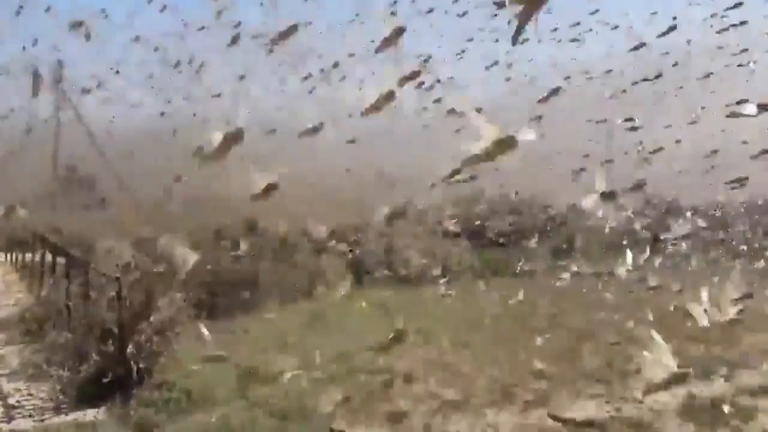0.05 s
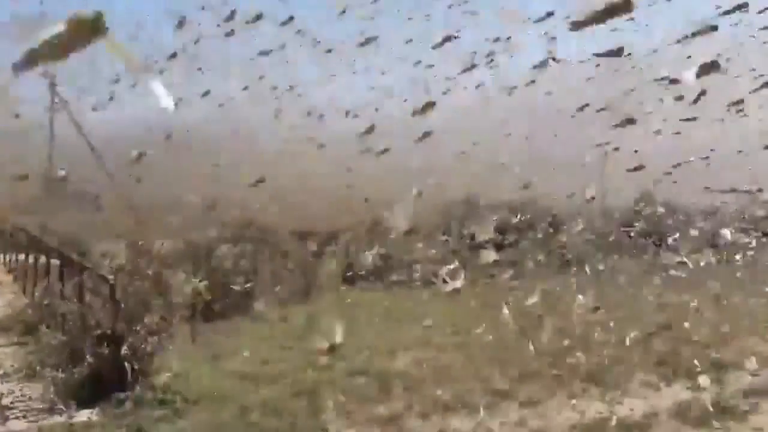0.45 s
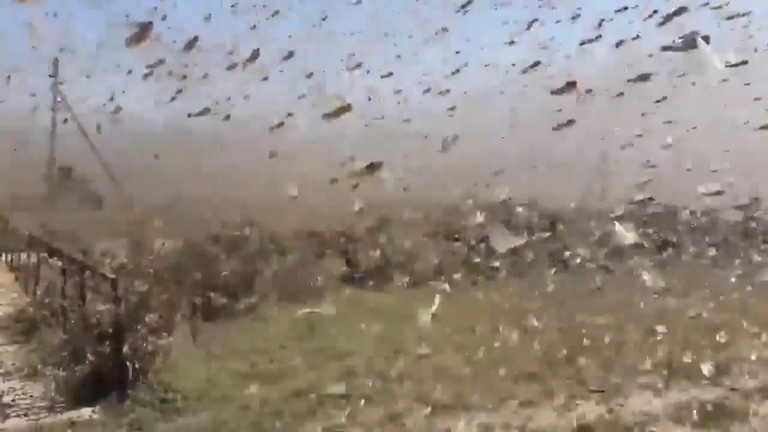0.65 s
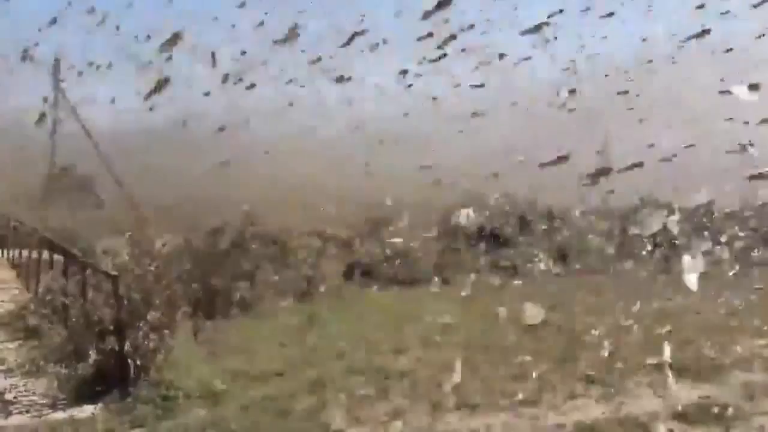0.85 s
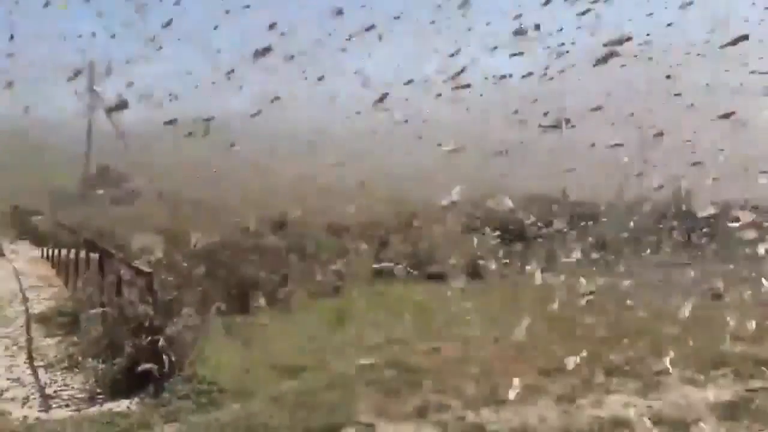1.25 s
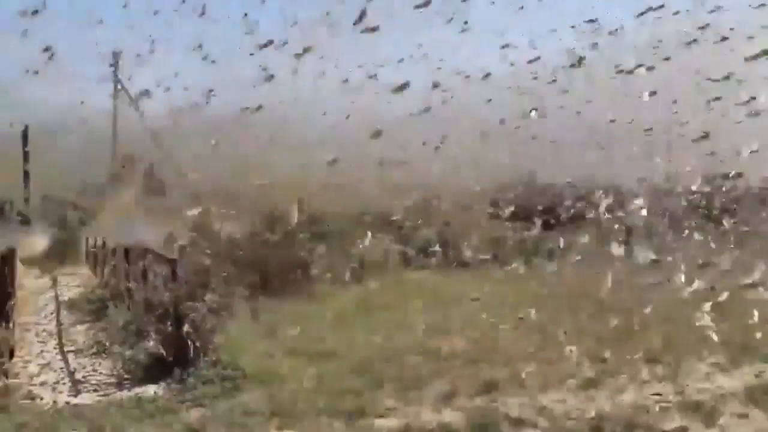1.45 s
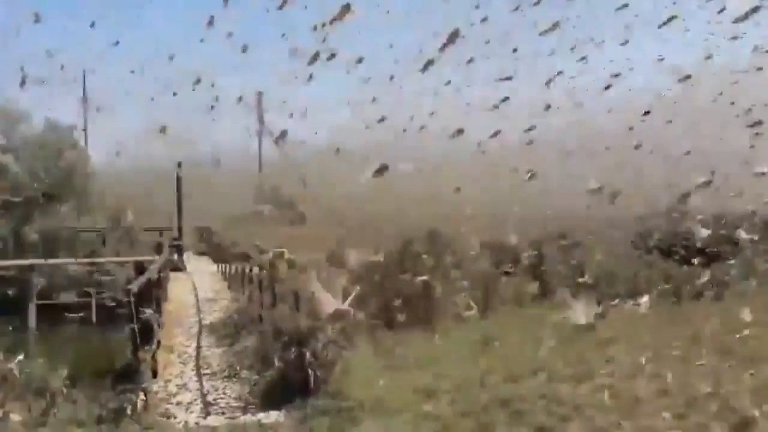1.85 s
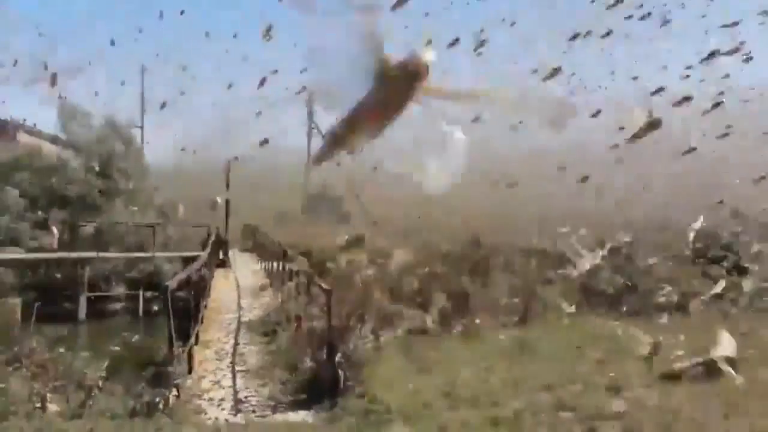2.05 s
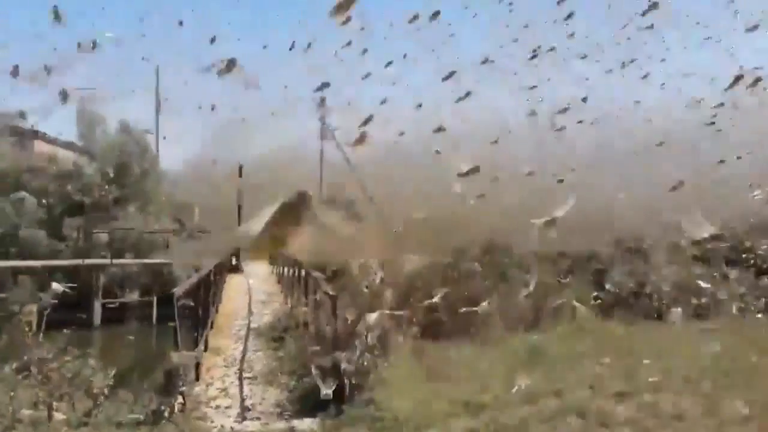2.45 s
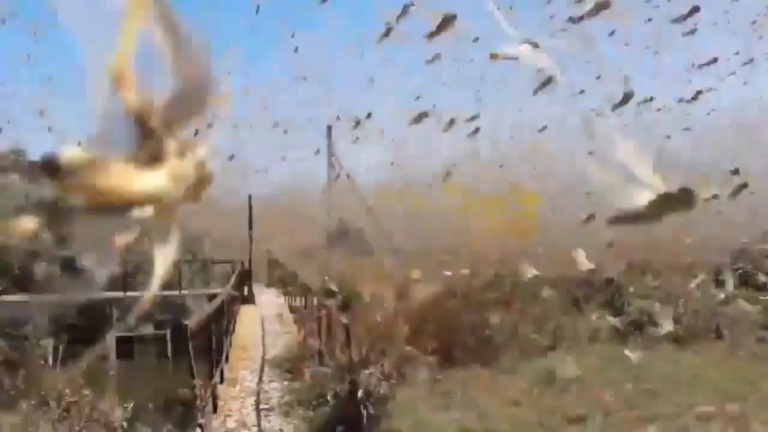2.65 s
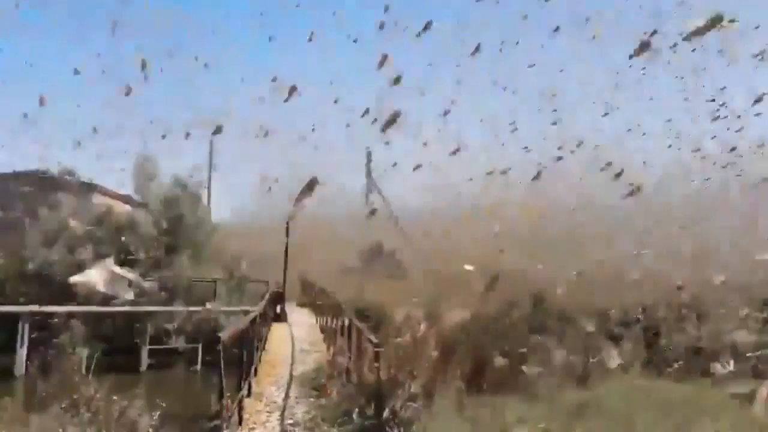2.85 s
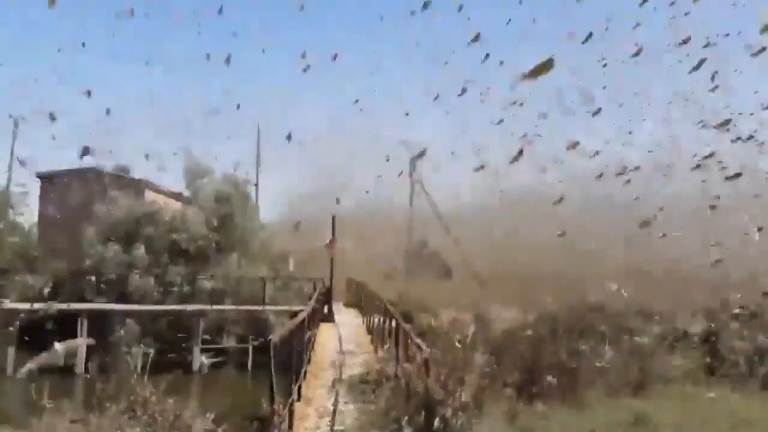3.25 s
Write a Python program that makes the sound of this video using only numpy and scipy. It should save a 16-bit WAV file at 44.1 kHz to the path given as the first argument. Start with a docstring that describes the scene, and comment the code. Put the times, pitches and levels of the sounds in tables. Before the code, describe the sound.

A locust swarm hisses and flutters while gusts of wind buffet the microphone.

```python
"""A grassy field under a locust swarm. Countless far wings add incoherently into a hiss, while nearer
insects tick once a wingbeat. Turbulent wind buffets the microphone port, louder and brighter as each
gust grows. One locust flutters right up to the microphone, brushes it with papery wings, knocks the
modes of its casing into ringing a few times and leaves."""
import sys
import numpy as np
from scipy import signal
from scipy.fft import rfft, irfft
from scipy.io import wavfile
from scipy.ndimage import uniform_filter1d

SR = 44100
rng = np.random.default_rng(int(sys.argv[2]) if len(sys.argv) > 2 else 0)


def transcribe(u):
    """Save the signal u as a 16-bit wav file named by the first command-line argument.

    u: samples, shape (n,) or (channels, n), limited to [-1, 1]; the rate is SR.
    q: integer samples, one column per channel.
    """
    v = np.clip(np.atleast_2d(u).T, -1, 1)
    q = np.round(v * 32767).astype(np.int16)
    wavfile.write(sys.argv[1], SR, q)


N = 145530
TIME = np.arange(N) / SR
CUTOFF_HZ = 15950

# Loudness of the distant swarm. Each row: time in seconds, level in dB.
SWARM_LEVEL_CURVE = [(0, -44), (.3, -44), (.9, -45), (1.2, -45), (1.65, -44.5), (2.1, -44), (2.45, -42),
                     (2.8, -45), (3.3, -45.5)]
# Spectrum of the distant swarm. Each row: frequency in Hz, relative spectral density in dB.
SWARM_SPECTRUM = [(150, -14), (550, 3), (850, -1), (1250, 0), (2000, -3), (2600, -6), (3900, -5),
                  (6200, -9.5), (8200, -7.5), (9700, -10), (11200, -8.5), (13500, -12.5), (15700, -12)]
# Breeze between the buffets. Each row: time in seconds, strength in dB.
BREEZE_CURVE = [(0, -37), (.18, -42.5), (.45, -36.5), (.68, -40), (.9, -33.5), (1.35, -30.5), (1.6, -30.5),
                (1.73, -37), (2.25, -42), (2.45, -34.5), (2.7, -37.5), (2.98, -40), (3.3, -39.5)]
# Buffets of wind on the microphone. Each row: start in seconds, length in seconds, strength in dB.
WIND_BUFFETS = [(.003, 0.016, -32.5), (0.097, 0.036, -33), (0.214, 0.04, -26.5), (0.282, 0.038, -34.5),
                (0.361, 0.03, -32), (0.428, 0.034, -26.5), (0.494, 0.016, -33.5), (0.567, 0.062, -29.5),
                (0.72, 0.026, -30.5), (0.749, 0.015, -19.5), (0.794, 0.088, -30.5), (0.906, 0.0048, -22),
                (0.936, 0.005, -23), (1, 0.03, -31), (1.038, 0.027, -29.5), (1.069, 0.019, -19),
                (1.102, 0.01, -16.5), (1.123, 0.0068, -27), (1.142, 0.022, -19.5), (1.18, 0.019, -16.5),
                (1.207, 0.03, -22), (1.32, 0.04, -28.5), (1.375, 0.017, -17.5), (1.411, 0.038, -21),
                (1.434, 0.027, -18), (1.472, 0.035, -21), (1.531, 0.053, -20.5), (1.565, 0.027, -22.5),
                (1.777, 0.023, -22.5), (1.877, 0.025, -27.5), (1.919, 0.011, -26), (1.975, 0.048, -26.5),
                (2.005, 0.036, -22.5), (2.075, 0.02, -28), (2.174, 0.045, -29), (2.28, 0.082, -33.5),
                (2.336, 0.077, -26.5), (2.394, 0.019, -29), (2.429, 0.021, -18), (2.501, 0.011, -25),
                (2.561, 0.041, -29.5), (2.626, 0.026, -26), (2.717, 0.025, -29.5), (2.756, 0.015, -20.5),
                (2.767, 0.019, -19.5), (2.829, 0.014, -17.5), (2.924, 0.021, -31.5), (3.001, 0.1, -35),
                (3.144, 0.024, -31)]
# Wind spectrum at the reference strength. Each row: frequency in Hz, relative spectral density in dB,
# growth in dB per dB of gust (raised to at least 0.5 in use).
WIND_SPECTRUM = [(25.1, -23, 3.5), (44.4, -6, -1.1), (74.6, -1.5, 0.42), (135, 4, 0.95), (233, -3, 1),
                 (301, -4, 1.46), (481, -19.5, 1.83), (780, -33.5, 1.53), (1070, -38.5, 0.5)]
# Puffs of air into the port. Each row: middle in seconds, Gaussian half width in seconds, level in dB.
AIR_PUFFS = [(1.184, 0.0085, -29.5), (1.417, 0.0086, -30.5), (1.78, 0.0064, -33), (2.015, 0.0073, -38.5),
             (2.396, 0.01, -29), (2.443, 0.0085, -21), (2.78, 0.0016, -16.5)]
# Spectrum of a puff. Each row: frequency in Hz, relative spectral density in dB.
PUFF_SPECTRUM = [(150, -31), (330, 0.5), (520, 14.5), (700, 2), (950, 1), (1400, -18), (2500, -34)]
# Single eddies slapping the port. Each row: middle in seconds, peak in dB, centre frequency in Hz.
EDDY_SLAPS = [(0.255, -18.5, 140), (0.37, -19.5, 157), (0.76, -15, 228), (0.9244, -13, 310),
              (0.9495, -11, 234), (1.100, -13.5, 322), (1.181, -9.5, 365), (1.4395, -10, 318),
              (1.487, -10, 326), (1.387, -18, 368), (1.54, -13, 260), (1.575, -10, 303), (1.784, -15, 415),
              (2.028, -16.5, 305), (2.4002, -11.5, 256), (2.772, -11, 197), (2.783, -9.5, 131),
              (2.8158, -12.5, 198), (2.828, -8, 227)]
# Modes of the casing. Each row: kind (0 thump, 1 knock, 2 snap, 3 tick), frequency in Hz,
# relative level in dB, time to decay by 60 dB in seconds.
CASING_MODES = [(0, 150, -4, 0.022), (1, 650, -6, .014), (1, 1080, -2, 0.013), (1, 1500, -3.5, 0.0076),
                (1, 2070, -4.5, 0.0062), (2, 2950, -8.5, 0.0045), (2, 5350, -4.5, 0.006),
                (2, 7400, -3, 0.0022), (2, 8340, 1.5, 0.0018), (3, 11600, -5.5, 0.0061),
                (3, 12400, 4, 0.0017), (3, 14400, 6, 0.0031), (3, 15500, -2, 0.0027)]
# Impacts of the locust on the casing. Each row: start in seconds, levels of thump, knock, snap and
# tick in dB, frequency favoured by the struck spot in Hz.
LOCUST_KNOCKS = [(2.5596, -6.5, -25.5, -28, -25.5, 1890), (2.6476, -40, -12, -32, -29, 1630),
                 (2.6537, -17, -15, -37, -44, 940), (2.6869, -57, -13, -19, -45, 1750)]
# Close wing strokes. Each row: time of the peak in seconds, level in dB, rise and decay time constants
# in seconds, stereo side level relative to the stroke in dB (before its high-pass).
WING_STROKES = [(0.015, -39.5, 0.0024, 0.0029, -1), (0.055, -36, 0.0002, 0.00074, -19),
                (0.104, -42, .002, 0.0022, -31), (0.147, -41, .002, .002, -31),
                (0.19, -43, .002, .002, -30), (0.225, -36.5, .002, 0.0036, -39),
                (0.237, -40.5, .004, .005, -36), (0.331, -38, .002, .002, -4),
                (0.388, -44, .002, .003, -27), (0.48, -39, .002, 0.0027, -32.5),
                (0.511, -48, .002, .003, -29), (0.55, -38, .002, 0.0018, -33),
                (0.736, -42, 0.0018, .002, -29), (1.319, -42, .003, .003, -31),
                (1.622, -43, .003, .014, -35), (1.979, -50, .002, .003, -28), (1.7, -41, .002, .003, -32),
                (1.995, -34, 0.0008, 0.0021, -37), (2.06, -43, 0.0026, 0.0037, -12),
                (2.096, -34.5, 0.00088, 0.0036, -38), (2.204, -29, 0.0019, 0.0026, -7),
                (2.213, -30, 0.0008, 0.0098, -22), (2.264, -39, 0.0023, 0.0067, -38),
                (2.281, -33.5, 0.0041, 0.0023, -44), (2.313, -36, .0005, 0.0013, -34),
                (2.328, -34, .002, 0.0033, -29), (2.351, -32.5, 0.0044, 0.011, -13),
                (2.362, -32, 0.001, 0.0044, -17), (2.3731, -28.5, 0.0022, 0.0082, -25),
                (2.389, -42, .004, 0.0094, -20), (2.411, -36, 0.0081, 0.011, -8),
                (2.440, -48, 0.025, 0.0086, -12), (2.481, -36, .001, 0.0089, -24),
                (2.540, -52, 0.0013, .001, 0), (2.644, -33, 0.0032, 0.0016, -7),
                (2.647, -31.5, 0.00083, 0.017, -13), (2.715, -40, 0.0022, 0.029, -48),
                (2.844, -37, .001, 0.0045, -12), (2.8605, -27.5, 0.0027, 0.0046, -6),
                (2.873, -37.5, 0.0012, 0.0079, -6), (2.986, -35, .0003, .0007, -32),
                (3.004, -39.5, 0.0025, 0.0056, -43), (3.019, -31.5, 0.0031, 0.0029, -42)]
# Spectrum of a close wing. Each row: frequency in Hz, relative spectral density in dB.
WING_SPECTRUM = [(400, 6), (900, 1), (1600, 5), (2500, 1), (4000, 1.5), (6300, -3), (7800, -0.5),
                 (9600, -4.5), (11200, -1), (13000, -3), (15700, -8)]


def from_db(db):
    """Amplitude grows tenfold for every 20 dB."""
    return 10 ** (np.asarray(db) / 20)


def unit_rms(x):
    """Normalisation to a mean power of one."""
    return x / np.sqrt(np.mean(x ** 2) + 1e-20)


def local_rms(x, size):
    """Running rms: power averaged twice over size samples."""
    return np.sqrt(uniform_filter1d(uniform_filter1d(x ** 2, size), size) + 1e-12)


def in_time(rows):
    """Linear interpolation of a control curve at every sample."""
    return np.interp(TIME, *np.transpose(rows))


def at_hz(rows, hz, column=1):
    """Interpolation of a spectrum table on a log-frequency axis."""
    rows = np.array(rows)
    return np.interp(np.log(hz), np.log(rows[:, 0]), rows[:, column])


def drift(hz):
    """Noise low-passed at hz gives a smooth random fluctuation of unit rms."""
    pole = np.exp(-2 * np.pi * hz / SR)
    return unit_rms(signal.lfilter([1], [1, -2 * pole, pole * pole], rng.standard_normal(N + SR))[SR:])


def colour(x, spectrum):
    """A minimum-phase filter of unit power gain imposes the spectrum, falling away below its first row."""
    size = 2 * N
    hz = np.maximum(np.arange(N + 1) * SR / size, 1)
    gain = unit_rms(from_db(at_hz(spectrum, hz)) / (1 + (spectrum[0][0] / hz / 2) ** 2))
    cepstrum = irfft(np.log(gain), size)
    response = np.exp(rfft(np.r_[cepstrum[0], 2 * cepstrum[1:N]], size))
    return irfft(rfft(x, size) * response, size)[:N]


def ring(force, hz, t60):
    """A damped resonator answers an impulse with an exponentially decaying sine."""
    pole, angle = np.exp(-np.log(1000) / (t60 * SR)), 2 * np.pi * hz / SR
    return signal.lfilter([0, np.sin(angle)], [1, -2 * pole * np.cos(angle), pole * pole], force + 1e-18)


def flicker(x, depth_db, bands=20):
    """Amplitude modulation: each frequency band swells and fades at random, giving a slight shimmer."""
    spectrum = rfft(x)
    position = np.minimum(np.arange(len(spectrum)) * SR / N / CUTOFF_HZ, 1) * (bands - 1)
    out = 0
    for k in range(bands):
        band = irfft(spectrum * np.maximum(1 - np.abs(position - k), 0), N)
        out = out + band * from_db(depth_db * drift(hz=11.3))
    return out * x.std() / out.std()


def far_swarm():
    """Incoherent addition: countless wings blend into a slightly grainy, flickering hiss."""
    grain = from_db(0.91 * drift(hz=560) + 0.79 * drift(hz=24))
    hiss = colour(unit_rms(rng.standard_normal(N) * grain), SWARM_SPECTRUM)
    return from_db(in_time(SWARM_LEVEL_CURVE)) * flicker(hiss, depth_db=0.96)


def near_fliers(count, wingbeat_hz=20.36, pass_s=0.041, tick_db=-44.5, tick_decay_s=0.0021):
    """Each passing insect ticks at its own wing resonance, swelling and fading as inverse distance."""
    low_hz, high_hz, bandwidth_hz = 3200, 13700, 2600   # wing resonances
    beats = np.arange(-6, 7)   # counted from the closest approach
    places = (np.arange(count) + rng.random(count)) / count   # fractions of the duration
    paces, sizes = rng.normal(1, 0.087, count), rng.standard_normal(count)
    resonances_hz = rng.uniform(low_hz, high_hz, count)
    out = 0
    for place, pace, size, hz in zip(places, paces, sizes, resonances_hz):
        offset_s = (beats + rng.normal(0, 0.025, len(beats))) / (wingbeat_hz * pace)
        at = ((place * N + offset_s * SR) % N).astype(int)
        scatter_db = 3 * np.clip(size / 2 + rng.standard_normal(len(beats)), -2, 2)
        ticks = np.zeros(N)
        ticks[at] = from_db(tick_db + scatter_db) / np.hypot(1, offset_s / pass_s)
        envelope = signal.lfilter([1], [1, -np.exp(-1 / (tick_decay_s * SR))], ticks + 1e-18)
        resonance = signal.iirpeak(hz, hz / bandwidth_hz, fs=SR)
        out = out + envelope * unit_rms(signal.lfilter(*resonance, rng.standard_normal(N)))
    swarm_db = in_time(SWARM_LEVEL_CURVE)
    return out * from_db(swarm_db - swarm_db.mean())


def gust_strength(attack_s=0.0047, release_s=0.011):
    """Wind strength in dB: the breeze adds in power to buffets that hit abruptly, hold and let go."""
    power = from_db(in_time(BREEZE_CURVE)) ** 2
    for start, length, db in WIND_BUFFETS:
        attack = np.clip((TIME - start) / attack_s, 0, 1)
        release = np.exp(-np.clip((TIME - start - length) / release_s, 0, 20))
        power = power + (from_db(db) * attack * release) ** 2
    return 10 * np.log10(power)


def wind(reference_gust_db=-25, reference_level_db=-24.5):
    """Turbulence at the port: small eddies make it lumpy, and gusts lift the mids more than the bass."""
    gust_db = gust_strength() - reference_gust_db
    eddies_db = 2.5 * drift(hz=79)
    edges = 20 * 2 ** np.arange(0, 6.5, .5)   # half-octave bands, Hz
    centres = np.sqrt(edges[1:] * edges[:-1])
    shares = from_db(at_hz(WIND_SPECTRUM, centres)) * np.sqrt(np.diff(edges))
    shares = shares / np.linalg.norm(shares)
    white = rng.standard_normal((2, N + SR))   # neighbouring bands get independent noise
    out, power = 0, 0
    for k, hz in enumerate(centres):
        band_pass = signal.butter(2, edges[k:k + 2], "band", fs=SR, output="sos")
        band = unit_rms(signal.sosfilt(np.vstack([band_pass, band_pass]), white[k % 2])[SR:])
        growth = np.maximum(at_hz(WIND_SPECTRUM, hz, column=2), .5)
        gain = shares[k] * from_db(growth * gust_db)
        out = out + gain * band * from_db(growth * eddies_db)
        power = power + gain ** 2
    # Slow chance swells are evened out, so the gusts set the level.
    return from_db(reference_level_db) * out / local_rms(out / np.sqrt(power), size=600)


def puffs():
    """Air striking the port head-on makes brief bursts of brighter turbulent noise."""
    air = colour(rng.standard_normal(N), PUFF_SPECTRUM)
    envelope = sum(from_db(db) * np.exp(-.5 * ((TIME - middle) / half_width) ** 2)
                   for middle, half_width, db in AIR_PUFFS)
    return air / local_rms(air, size=500) * envelope


def slaps():
    """An eddy crossing the port is one pressure pulse: a peak between two shallow troughs."""
    out = 0
    for middle, db, hz in EDDY_SLAPS:
        exponent = np.minimum((np.pi * hz * (TIME - middle)) ** 2, 20)
        out = out + from_db(db) * (1 - 2 * exponent) * np.exp(-exponent)
    return out


def casing_knocks(scratch_lag_s=0.0011, scratch_decay_s=0.00086, spot_db_per_octave=11.5):
    """Modal ringing: each impact of the locust pushes the low modes, then scratches the high ones."""
    out, t = np.zeros(N + SR), TIME[:SR // 10]
    for start, *levels_db, spot_hz in LOCUST_KNOCKS:
        for k, (kind, hz, db, t60) in enumerate(CASING_MODES):
            kind = int(round(kind))
            if kind < 2:   # half-sine push, its sign alternating from mode to mode
                at = int(start * SR)
                force = -(-1) ** k * np.sin(np.pi * np.minimum(2 * hz * t, 1))
            else:
                at = int((start + scratch_lag_s) * SR)
                force = rng.standard_normal(len(t)) * np.exp(-t / scratch_decay_s)
            # The struck spot weakens knock modes far from its frequency, by up to 8 dB.
            spot_db = max(-spot_db_per_octave * abs(np.log2(hz / spot_hz)), -8) if kind == 1 else 0
            tone = ring(force, hz, t60)
            out[at:at + len(t)] += from_db(levels_db[kind] + db + spot_db) * tone / np.abs(tone).max()
    return out[:N]


def close_wings(crinkle_db=3.5, side_above_hz=4100):
    """Papery wings crinkle in noise bursts that add in power; the closest differ left to right in treble."""
    mid_power, side_power = 0, 0
    for peak, db, rise, decay, side_db in WING_STROKES:
        exponent = np.maximum((peak - TIME) / rise, (TIME - peak) / decay)
        stroke = from_db(db) * np.exp(-np.minimum(exponent, 20))
        mid_power = mid_power + stroke ** 2
        side_power = side_power + (stroke * from_db(side_db)) ** 2
    crinkle = from_db(crinkle_db * np.clip(drift(hz=1150), -2, 2))
    crinkle = crinkle / local_rms(crinkle, size=160)
    mid, side = (colour(np.sqrt(power) * crinkle * rng.standard_normal(N), WING_SPECTRUM)
                 for power in (mid_power, side_power))
    side = signal.sosfilt(signal.butter(4, side_above_hz, "high", fs=SR, output="sos"), side)
    return flicker(mid, depth_db=3.5) + side * np.array([[1], [-1]])


def scene():
    """Superposition of wind and insects; all but the close wings is the same in both channels."""
    air = wind() + puffs() + slaps()
    return air + far_swarm() + near_fliers(count=26) + casing_knocks() + close_wings()


def record(dry, low_cut_hz=72, ceiling_db=-6.0):
    """Band limiting and soft saturation: deep rumble is removed, peaks are rounded, the top is cut."""
    ceiling = from_db(ceiling_db)
    high_passed = signal.sosfilt(signal.butter(2, low_cut_hz, "high", fs=SR, output="sos"), dry)
    rounded = ceiling * np.tanh(high_passed / ceiling)
    low_pass = signal.firwin(401, CUTOFF_HZ, fs=SR, window=("kaiser", 9))
    return signal.fftconvolve(rounded, low_pass[None], "same", axes=1)


dry = scene()
out = record(dry)
transcribe(out)
```